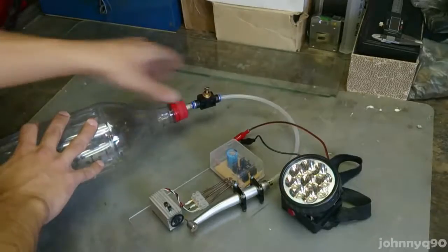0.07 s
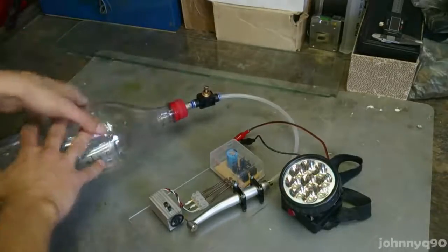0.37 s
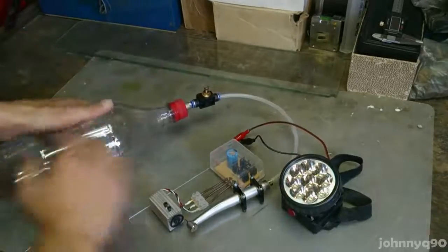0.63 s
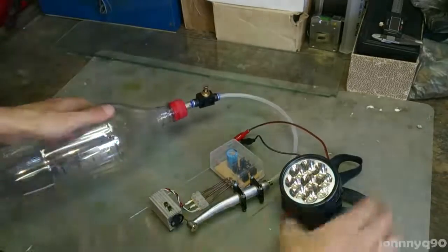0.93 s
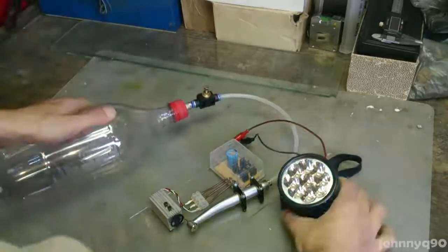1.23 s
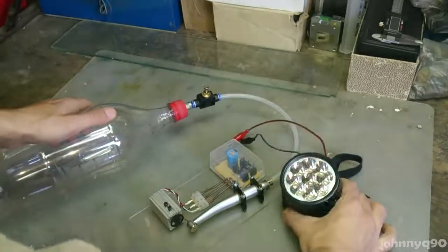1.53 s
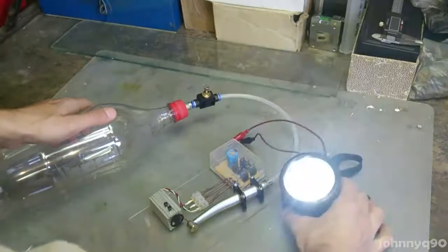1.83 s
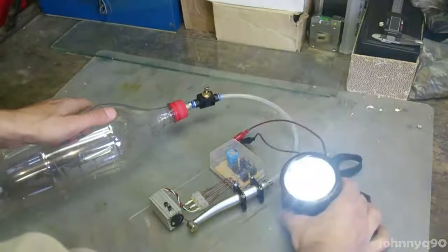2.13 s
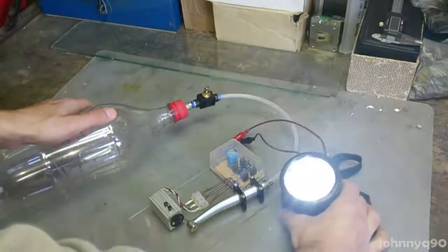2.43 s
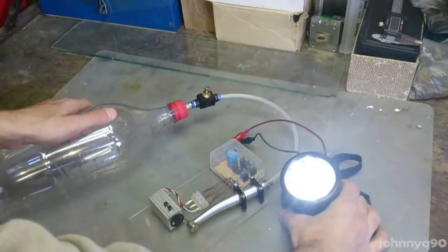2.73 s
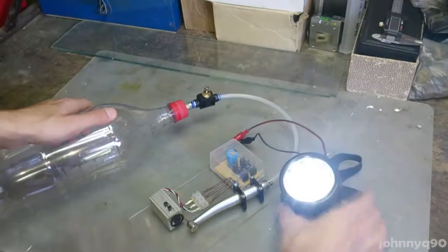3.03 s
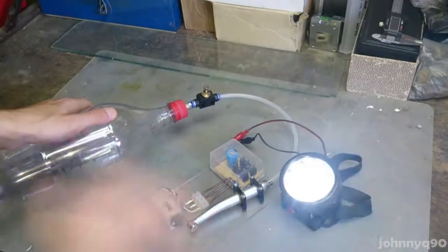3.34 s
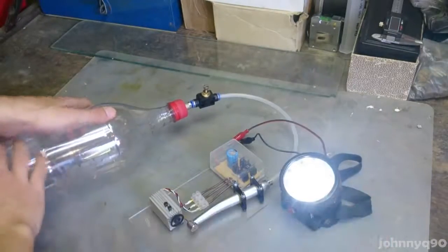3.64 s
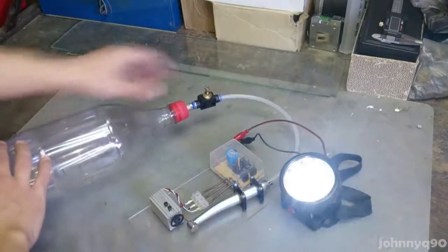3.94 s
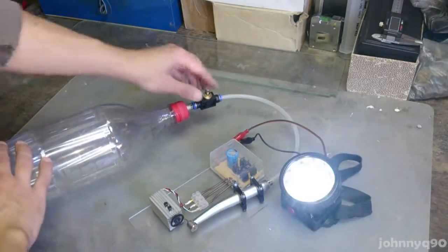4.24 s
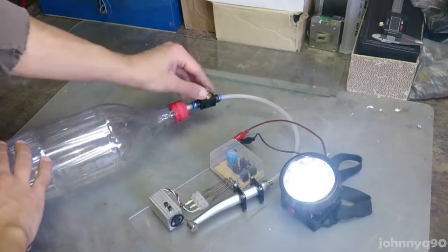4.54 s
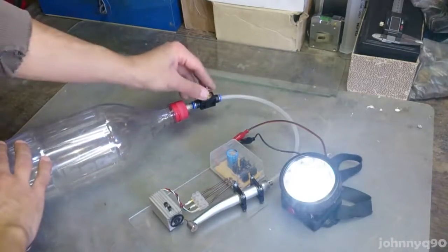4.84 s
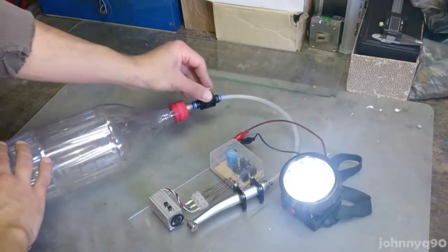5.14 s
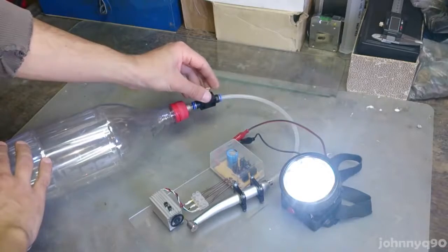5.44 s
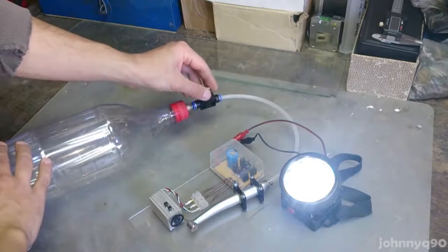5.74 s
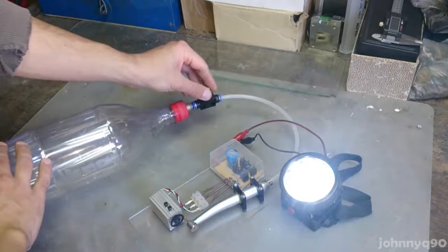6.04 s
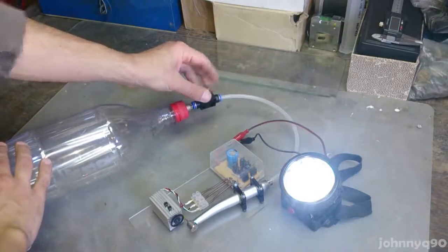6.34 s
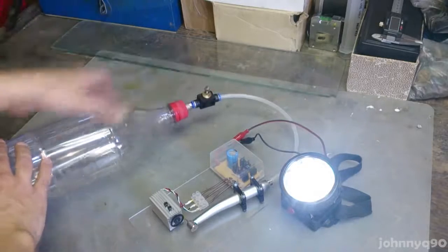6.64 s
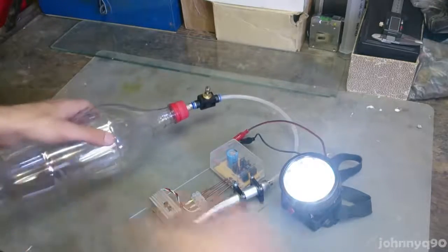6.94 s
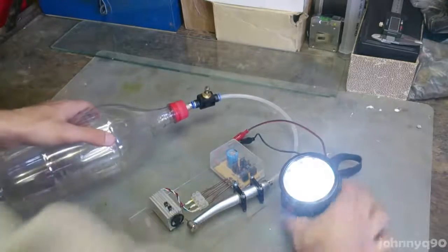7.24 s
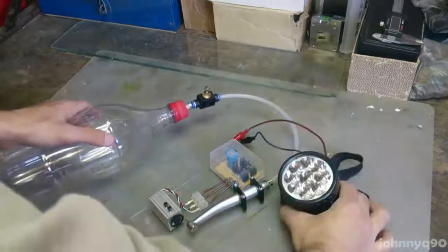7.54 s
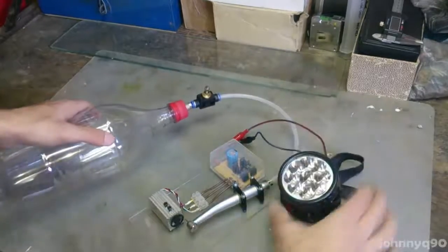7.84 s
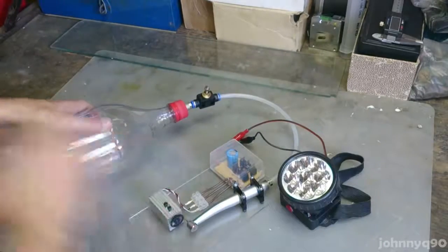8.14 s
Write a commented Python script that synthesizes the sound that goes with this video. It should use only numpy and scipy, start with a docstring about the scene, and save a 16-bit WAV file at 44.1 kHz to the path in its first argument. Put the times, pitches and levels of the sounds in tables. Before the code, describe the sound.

Loud compressed air hiss with a thin, shifting turbine whine, plus small switch clicks and soft handling bumps on a workbench.

```python
"""A thin whine climbs out of a loud hiss: a dental turbine spinning up on compressed air from a plastic
bottle on a workbench. Its ball bearing sings over the hum of the shaft while the exhaust jet rushes on.
The turbine drives a tiny generator, so the pitch dives when a lamp clicks on, lifts as the valve is
opened further and jumps when the lamp clicks off, sagging in between as the bottle empties.
Hands bump and rub the bottle over the low rumble of the workshop."""
import sys
import numpy as np
from scipy import signal
from scipy.fft import rfft, irfft, next_fast_len
from scipy.io import wavfile
from scipy.ndimage import uniform_filter1d

SR = 44100
rng = np.random.default_rng(int(sys.argv[2]) if len(sys.argv) > 2 else 0)


def store_wav(level_fs):
    """Save 16-bit WAV to argv[1]."""
    pcm = np.round(np.clip(np.atleast_2d(level_fs), -1, 1) * 32767)
    wavfile.write(sys.argv[1], SR, pcm.T.astype(np.int16))


N = 361179
TIME = np.arange(N) / SR
BALL_PASSES = 7.121  # whine cycles per turn of the shaft


def turbine(jitter_hz=1.78):
    """One rotor speed drives the bearing, the shaft and all their partials."""
    hz = uniform_filter1d(rotor_hz(TIME), size=1800, mode="nearest") + jitter_hz * wander(40, 1)[0]
    phase = 2 * np.pi * np.cumsum(hz) / SR
    return np.sqrt(2) * (bearing(hz, phase) + shaft_hum(hz, phase) + overtones(hz, phase))


def rotor_hz(t, start_hz=3265, sag_hz_per_s=219.5):
    """Pitch of the whine: it sags as the bottle empties and trails each change of drive or load."""
    # Each row: start in seconds, pitch change in Hz, lag in seconds. In order: spin-up, lamp on,
    # two turns of the valve, a last nudge, the drive weakening, lamp off.
    speed_steps = [(0, 914.5, .204), (1.73, -622, .152), (4.639, 375, .273), (5.03, 478.5, .163),
                   (6.224, 52, .143), (6.669, -82.5, .8), (7.596, 526, .267)]
    bends = sum(change * (1 - np.exp(-np.maximum(t - s, 0) / lag)) for s, change, lag in speed_steps)
    return start_hz - sag_hz_per_s * t + bends


def bearing(hz, phase, lag_rad=1.85, drift_rad=0.4, grit_db=-30):
    """Balls pass the race about seven times a turn and whine; rough rolling adds a skirt of noise."""
    # The right side hears the whine later, by an angle that drifts with the standing waves.
    stereo_phase = phase - np.array([[0], [1]]) * (lag_rad + drift_rad * wander(1.9, 1))
    grit = amp(grit_db) * wander(70) * np.cos(stereo_phase)
    whine = amp(whine_db(hz)) * (np.sin(stereo_phase) + grit)
    return whine + side_tones(hz, stereo_phase, phase / BALL_PASSES) + chatter(stereo_phase[0])


def whine_db(hz, flicker_db=3.5, fast_glide_hz_per_s=1500, flutter_db=1.67):
    """Standing waves over the bench make the whine loud at some pitches and faint at others."""
    # The standing waves. Each row: pitch in Hz, left and right level in dB.
    standing_waves = [(2582.0, -25.9, -44.5), (2633.0, -29.1, -52.7), (2721.0, -22.2, -33.8),
                      (2793.0, -28.7, -44.4), (2883.0, -23.5, -41.0), (2928.0, -32.3, -34.3),
                      (2958.0, -27.6, -38.9), (3004.0, -32.9, -50.4), (3064.0, -25.4, -37.2),
                      (3126.0, -32.2, -48.9), (3150.0, -25.3, -39.0), (3259.0, -31.3, -37.0),
                      (3321.0, -22.5, -34.4), (3599.0, -26.0, -36.1), (3849.0, -25.1, -37.0),
                      (3860.0, -29.1, -34.8), (3940.0, -21.9, -41.9), (4000.0, -30.8, -35.7)]
    # The whine's slow swell. Each row: time in seconds, gain in dB.
    swell = [(0, 1), (.6, 2), (1.7, .6), (2.5, -3.5), (3.1, 1.2), (4.9, 1.8), (5.4, 1.8), (5.8, .8),
             (6.3, 5.2), (7.0, .4), (7.4, .3), (7.85, -3.8), (8.1, -4.3)]
    # Dips as a hand moves close. Each row: centre and length in seconds, gain in dB.
    falters = [(1.422, 0.05, -11), (6.87, .11, -18), (7.468, 0.1, -13)]
    sway = np.array([[0.9], [3]]) * wander(3)  # the waves shift as the hands move
    dips = sum(db * bell(TIME, s, length) for s, length, db in falters)
    glide = np.minimum(abs(np.gradient(rotor_hz(TIME), TIME)) / fast_glide_hz_per_s, 1)
    flicker = flicker_db * glide * wander(18)  # quick glides cross the finer standing waves
    flutter = flutter_db * wander(34, 1)
    return spectrum(standing_waves, hz) + curves(swell) + sway + dips + flicker + flutter


def side_tones(hz, phase, shaft_phase, trim_db=-1.2, rough_db=3):
    """Unbalance modulates the whine once a turn, adding a tone one shaft rate below and one above."""
    # Loudness of the lower and the upper tone. Each row: its own pitch in Hz, level in dB.
    lower_response = [(2210, -45.5), (2510, -33), (2630, -39.5), (2710, -31.5), (2880, -38), (2980, -40),
                      (3190, -43), (3360, -33.5)]
    upper_response = [(2920, -46), (3040, -36), (3140, -48), (3275, -50), (3315, -32), (3540, -33.5),
                      (3610, -55), (4500, -45)]
    shaft_hz = hz / BALL_PASSES
    levels = np.vstack([spectrum(lower_response, hz - shaft_hz), spectrum(upper_response, hz + shaft_hz)])
    lower_gain, upper_gain = amp(levels + trim_db + rough_db * wander(30))
    wobble = shaft_phase + 0.36 * wander(31, 1)
    lower = lower_gain * np.sin(phase - wobble + 0.3 * wander(56))
    upper = upper_gain * np.sin(phase + wobble)
    return (lower + upper) * pan(right_db=-11)


def chatter(phase, level_db=-36):
    """As the load comes on, the bearing chatters briefly at half its pitch."""
    envelope = amp(level_db) * bell(TIME, centre_s=2.014, length_s=0.22)
    return envelope * np.sin(phase / 2 + 0.52 * wander(40, 1)) * pan(right_db=-5)


def shaft_hum(hz, phase, waver_db=2.07, octave_db=-57, mount_hz=790, mount_width_hz=200):
    """The unbalanced shaft hums; its octave comes and goes as it passes a resonance of the mount."""
    # Loudness of the hum. Each row: shaft rate in Hz, left and right level in dB.
    hum_response = [(360.0, -51.7, -55.1), (386.0, -63.5, -52.0), (402.0, -52.4, -67.5),
                    (414.0, -50.0, -61.2), (428.0, -49.9, -70.8), (445.0, -45.9, -51.5),
                    (475.0, -39.1, -44.2), (500.0, -46.9, -50.1), (522.0, -45.3, -44.3),
                    (560.0, -51.4, -47.0)]
    shaft_hz, shaft_phase = hz / BALL_PASSES, phase / BALL_PASSES
    hum_gain = amp(spectrum(hum_response, shaft_hz) + waver_db * wander(8.7, 1))
    hum = hum_gain * np.sin(shaft_phase + 0.3 * wander(1.5))
    octave_gain = amp(octave_db + 4.3 * wander(7.7, 1)) * peak(2 * shaft_hz, mount_hz, mount_width_hz)
    octave = octave_gain * np.sin(2 * shaft_phase + 0.067 * wander(3.4))
    return hum + octave * pan(right_db=-4)


def overtones(hz, phase, rough_db=4.5, blur_rad=0.17):
    """Faint partials pass the same resonances as the air, and swell and fade in the room."""
    # Shaft harmonics. Each row: multiple of the shaft rate, left and right dB above the jet's colour.
    shaft_orders = [(3, 20.5, 21.5), (4, 15.5, 25), (5, 20.5, 15), (19, 13, 14), (22, 11.5, 11),
                    (25, -6, 11)]
    # Bearing partials. Each row: multiple of the whine, shaft rates added, left and right dB likewise.
    bearing_orders = [(1, -2, 20, 21), (2, 0, 11, 12), (2, 1, -3, 1), (3, 0, 18, -1)]
    partials = [(k / BALL_PASSES, *db) for k, *db in shaft_orders]
    partials += [(k + added / BALL_PASSES, *db) for k, added, *db in bearing_orders]
    shake = blur_rad * wander(30, 1)[0]
    out = np.zeros((2, N))
    for ratio, left, right in partials:
        coarse_gains = amp(jet_colour(ratio * hz[::512]) + [[left], [right]])
        gains = np.array([np.interp(TIME, TIME[::512], gain) for gain in coarse_gains])
        out += gains * np.sin(ratio * phase + shake)
    return room(out * amp(rough_db * wander(27)), wet_db=0.5, t60=0.2)


def exhaust(direct_share=0.24, lag_s=6.5 / SR, churn_db_per_octave=10, patchy_db=1.42, sputter_db=0.43):
    """Turbulent air hisses and sputters; a faster rotor churns up more mid-range noise."""
    hz, t, noise = signal.stft(rng.standard_normal((3, N)), SR, nperseg=512, noverlap=384)
    # Part of the jet arrives directly, a touch later on the right; the rest is scattered.
    delay = np.exp(-2j * np.pi * np.outer([0, lag_s], hz))[:, :, None]
    air = np.sqrt(direct_share) * delay * noise[0] + np.sqrt(1 - direct_share) * noise[1:]
    octaves = np.log2(rotor_hz(t))
    mid_band = 1 / (1 + ((hz[:, None] - 1900) / 700) ** 4)
    churn = churn_db_per_octave * (octaves - octaves.mean()) * mid_band
    patches = uniform_filter1d(rng.standard_normal(air.shape), size=9, axis=1)
    patches = uniform_filter1d(patches, size=12, axis=2)
    sputter = uniform_filter1d(rng.standard_normal(len(t)), size=6)
    turbulence = patchy_db * patches / patches.std() + sputter_db * sputter / sputter.std()
    level_db = jet_colour(hz)[:, :, None] + jet_flow(hz, t) + churn + turbulence
    _, jet = signal.istft(air * amp(level_db), SR, nperseg=512, noverlap=384)
    return room(jet[:, :N] * np.sqrt(SR / 2), wet_db=-6, t60=0.11)


def jet_flow(hz, t, body_swing=1.16, fizz_db=-0.4):
    """The jet's rise and fall in dB; the body of the hiss swings a little wider than its top fizz."""
    # Slow strength of the jet. Each row: time in seconds, gain of the fizz in dB.
    flow = [(0, 2), (.7, 2.5), (.95, 1.3), (1.65, .7), (1.87, 3), (2.3, -.8), (3, 0.05), (3.3, .7),
            (4.2, 1.3), (5.2, 1.25), (5.45, 3), (6.3, -0.5), (6.85, 0.86), (7.35, 1.06), (7.8, -2),
            (8.19, -2)]
    # Swells and dips as the hands move. Each row: centre and length in seconds, gain of the fizz in dB.
    gusts = [(0.447, 0.049, 2), (1.144, 0.039, 2), (1.464, .07, -0.5), (3.735, 0.049, 2.5),
             (3.84, 0.089, -2.5), (3.985, 0.044, -2), (4.09, 0.044, 1.5), (4.512, 0.045, 1),
             (4.864, 0.031, 1), (4.908, .05, -2.5), (4.956, 0.022, 3), (7.51, 0.044, -5),
             (7.626, .04, -1.5)]
    strength = curves(flow, t)[0] + sum(db * bell(t, s, length) for s, length, db in gusts)
    top = np.clip((hz - 9500) / 3000, 0, 1)[:, None]
    return (1 - top) * body_swing * strength + top * (strength + fizz_db)


def jet_colour(hz):
    """Tone colour of the air noise in dB: a broad slope with resonances on it."""
    # The bare jet. Each row: frequency in Hz, left and right level in dB per Hz.
    slope = [(337, -99.3, -99.5), (764, -81.5, -81.5), (977, -94.5, -95), (1593, -73.5, -75.5),
             (2096, -87, -97.5), (3490, -69, -74.5), (4860, -67, -79), (7580, -66.5, -82.5),
             (9330, -58, -80), (11130, -63.5, -66.5), (13540, -62, -57), (15450.0, -67.5, -69.5)]
    # Peaks and dips of head, hose and bench. Each row: centre and width in Hz, left and right gain in dB.
    resonances = [(285, 150, -26.5, 11), (474.5, 100, 26, 7), (1066, 84, 15, 7), (1223, 147, 8, 7),
                  (1838, 380, 12, 8), (2137, 110, 7.5, 16.5), (2440, 169, 18, 14), (2665, 310, 9.5, 14),
                  (3410, 270, 7, 0.5), (4905, 520, 3, 9), (6120, 470, 4, 16), (6430, 280, 9.5, -10.5),
                  (7170, 500, 2, 11), (7350, 270, -4.5, -3), (8900, 1900, 1, 13), (10200, 800, 6.5, -0.5),
                  (10610, 127, 8.5, 2), (11660, 350, 7, 2.5), (14700, 450, 12, 10)]
    peaks = sum(np.array([[left], [right]]) * peak(hz, centre, width)
                for centre, width, left, right in resonances)
    return spectrum(slope, hz) + peaks


def lamp_switch(attack_s=0.00037):
    """Each snap of the switch is a short, bright burst in the lamp's plastic case."""
    # The snaps. Each row: start in seconds, level in dB, time to fade by 60 dB in seconds.
    clicks = [(1.484, -17, .02), (1.499, -13, .045), (1.715, -6, .02), (1.72, -18, .076), (7.667, -18, .05),
              (7.8399, -10, .02)]
    # Colour of the case. Each row: frequency in Hz, relative level in dB.
    case_colour = [(100, -33), (250, -27), (900, -24), (1800, -4), (3500, 1), (6500, -1), (9000, 0),
                   (11500, -10), (16000, -18)]
    out, t = np.zeros((2, N)), np.arange(SR // 4) / SR
    colour = amp(spectrum(case_colour, np.fft.rfftfreq(len(t), 1 / SR)))
    for s, db, t60 in clicks:
        burst = irfft(rfft(rng.standard_normal((2, len(t)))) * colour, len(t))
        envelope = np.minimum(t / attack_s, 1) * amp(db - 60 * t / t60)
        add(out, s, envelope * burst / burst.std())
    return room(out * pan(right_db=-6), wet_db=-1, t60=0.16)


def bench(stereo_spread=0.36):
    """Soft knocks swing the bench top briefly, over the low rumble of the workshop."""
    # The knocks. Each row: start in seconds, level in dB, pitch in Hz, time to fade by 60 dB in seconds.
    knocks = [(0.1783, -16.5, 58, 0.023), (0.208, -27, 28, 0.18), (.625, -44, 95, 0.084),
              (1.645, -34, 31.3, 0.42), (1.721, -35, 132, 0.033)]
    # Colour of the rumble. Each row: frequency in Hz, level in dB per Hz.
    rumble = [(10, -80.5), (28, -73), (36, -73), (42, -59), (50, -83), (75, -79.5), (110, -97),
              (180, -92.5), (300, -89.5), (600, -100), (3000, -130)]
    size = next_fast_len(N)
    colour = amp(spectrum(rumble, np.fft.rfftfreq(size, 1 / SR)))
    noise = rng.standard_normal((3, size))
    out = irfft(rfft(noise[0] + stereo_spread * noise[1:]) * colour)[:, :N] * np.sqrt(SR / 2)
    t = np.arange(SR // 2) / SR
    for s, db, pitch, t60 in knocks:
        thud = amp(db - 60 * t / t60) * np.sin(2 * np.pi * pitch * t)
        add(out, s, np.tile(thud, (2, 1)))
    return out * pan(right_db=-5)


def hands(band_hz=(70, 170), uneven_db=1.4):
    """Hands shift on the bottle and the lamp: dull, uneven rubbing carried by the bench."""
    # The rubs. Each row: centre and length in seconds, level in dB.
    rubs = [(.45, 0.4, -54.5), (0.888, 0.25, -55), (1.46, 0.17, -56), (3.1, 0.48, -63.5), (3.8, .4, -70),
            (5.4, 0.88, -73), (6.952, 0.48, -64.5)]
    band = signal.butter(3, band_hz, "bandpass", fs=SR, output="sos")
    friction = signal.sosfilt(band, rng.standard_normal(N))
    pressure = sum(amp(db) * bell(TIME, s, length) for s, length, db in rubs)
    return friction / friction.std() * pressure * amp(uneven_db * wander(9.6, 1)) * pan(right_db=-5)


def room(x, wet_db, t60):
    """Direct sound plus sparse reflections, different on each side; the power is kept."""
    t = np.arange(SR // 3) / SR
    taps = rng.standard_normal((2, len(t))) * (rng.random((2, len(t))) < 1 / 20) * amp(-60 * t / t60)
    taps *= amp(wet_db) / np.linalg.norm(taps, axis=1, keepdims=True)
    taps[:, 0] = 1
    return signal.oaconvolve(x, taps / np.linalg.norm(taps, axis=1, keepdims=True), axes=1)[:, :N]


def amp(db):
    """Decibels to gain."""
    return 10 ** (np.asarray(db) / 20)


def pan(right_db):
    """Stereo gains that trim the right side only."""
    return amp([[0], [right_db]])


def bell(t, centre_s, length_s):
    """A smooth rise and fall in time."""
    return np.exp(-(2 * (t - centre_s) / length_s) ** 2)


def peak(hz, centre_hz, width_hz):
    """A resonance curve of height 1."""
    return 1 / (1 + (2 * (hz - centre_hz) / width_hz) ** 2)


def curves(rows, t=TIME):
    """The columns of a table, joined by straight lines in time."""
    s, *columns = np.transpose(rows)
    return np.array([np.interp(t, s, c) for c in columns])


def spectrum(rows, hz):
    """The columns of a table, joined by straight lines on a log-frequency axis."""
    f, *columns = np.transpose(rows)
    return np.array([np.interp(np.log(hz + 1), np.log(f + 1), c) for c in columns])


def wander(rate_hz, channels=2):
    """Random drift of rms about 1, with little movement above the given rate."""
    t = np.arange(0, N + 64, 64) / SR
    hz = np.fft.rfftfreq(len(t), t[1])
    drift = irfft(rfft(rng.standard_normal((channels, len(t)))) / (1 + (hz / rate_hz) ** 2), len(t))
    return np.array([np.interp(TIME, t, row / row.std()) for row in drift])


def add(mix, start_s, sound):
    """Mixes a stereo sound in at its start time."""
    part = mix[:, round(start_s * SR):][:, :sound.shape[1]]
    part += sound[:, :part.shape[1]]


def scene():
    """Turbine, air and handling, a little to the left."""
    return turbine() + exhaust() + lamp_switch() + bench() + hands()


def record(dry, cutoff_hz=15560):
    """A steep low-pass takes off the very top of the hiss."""
    low_pass = signal.firwin(1023, cutoff_hz, window=("kaiser", 9), fs=SR)
    return signal.oaconvolve(dry, low_pass[None], "same", axes=1)


dry = scene()
out = record(dry)
store_wav(out)
```